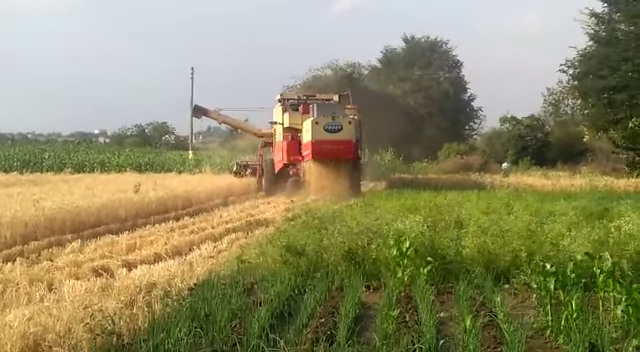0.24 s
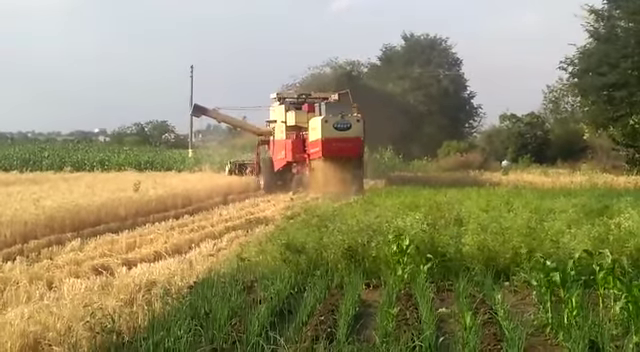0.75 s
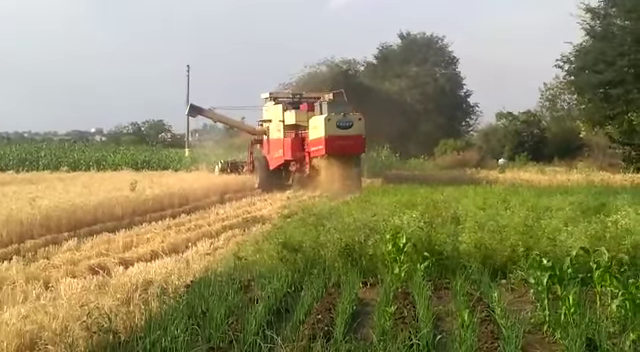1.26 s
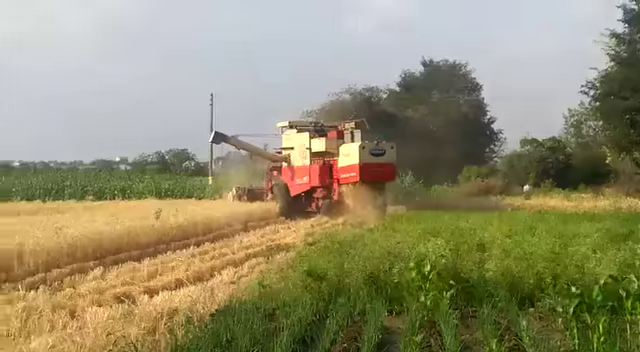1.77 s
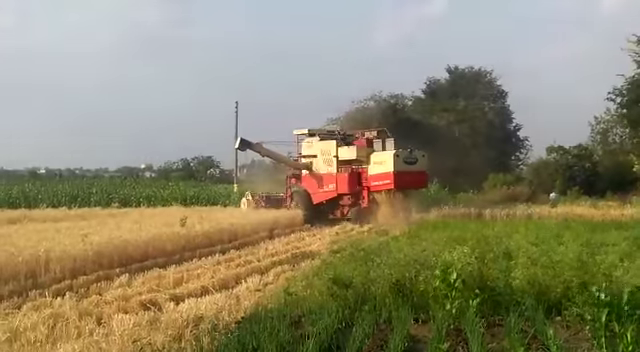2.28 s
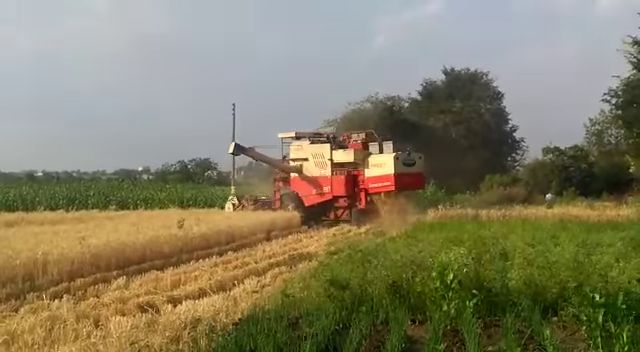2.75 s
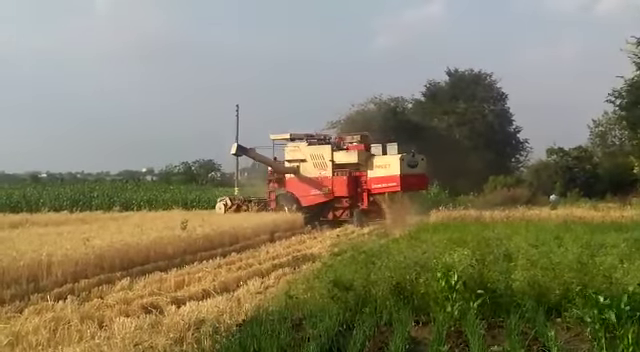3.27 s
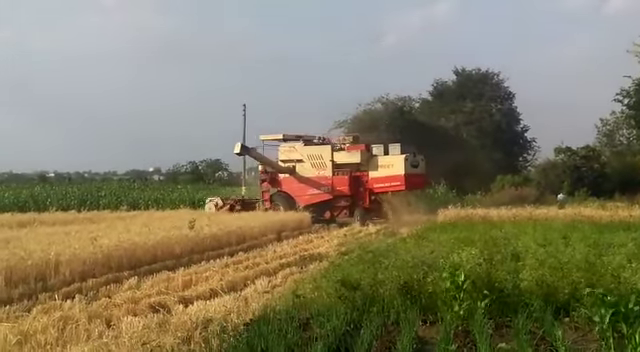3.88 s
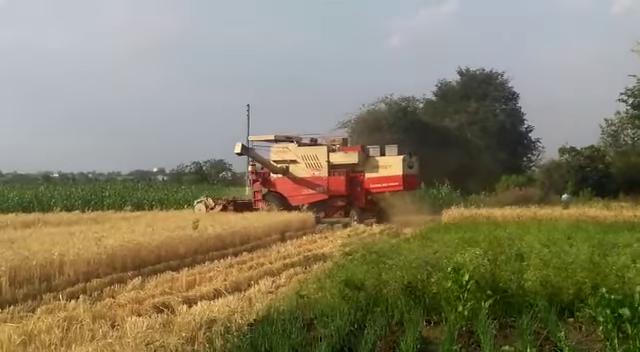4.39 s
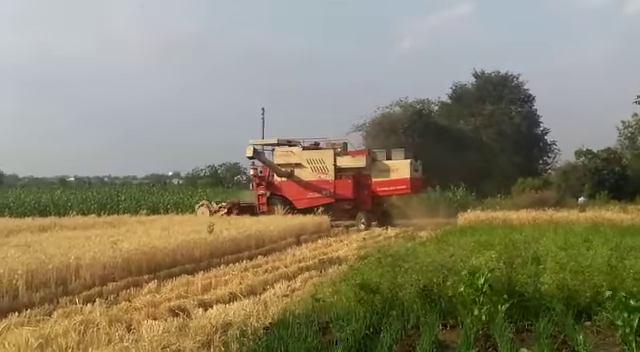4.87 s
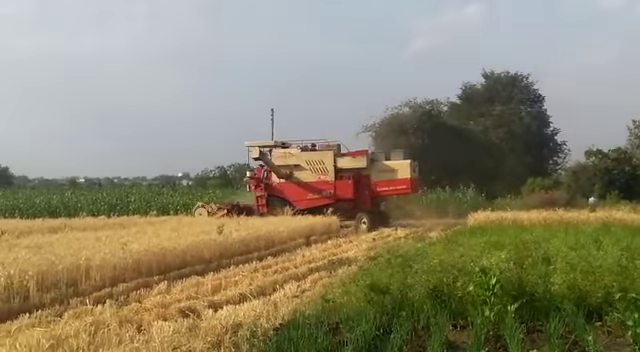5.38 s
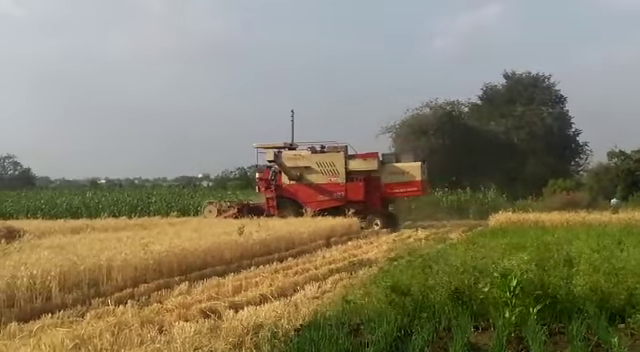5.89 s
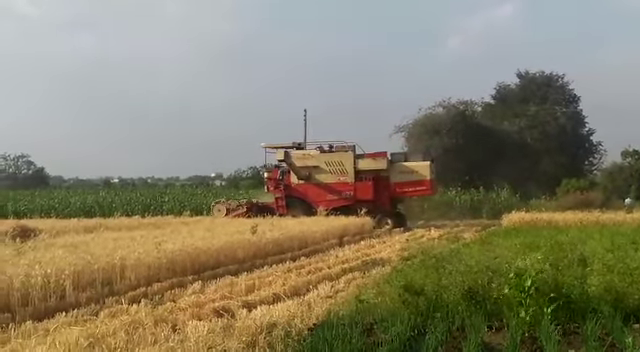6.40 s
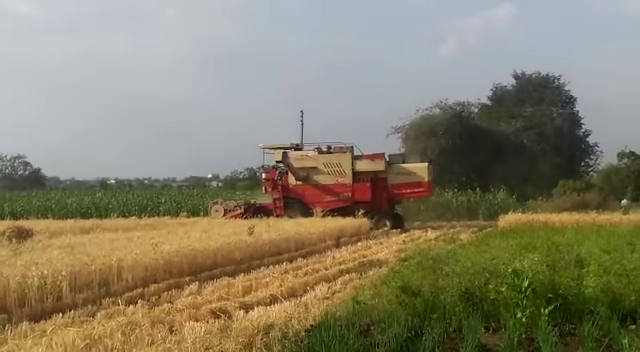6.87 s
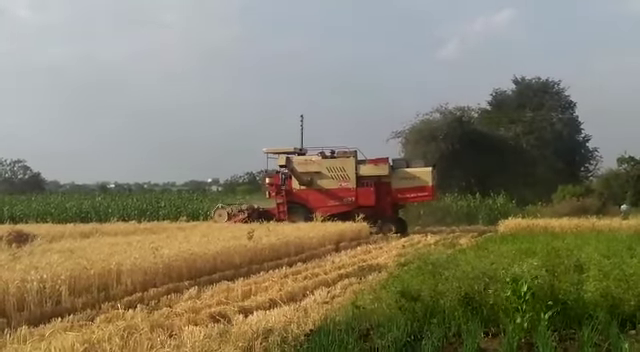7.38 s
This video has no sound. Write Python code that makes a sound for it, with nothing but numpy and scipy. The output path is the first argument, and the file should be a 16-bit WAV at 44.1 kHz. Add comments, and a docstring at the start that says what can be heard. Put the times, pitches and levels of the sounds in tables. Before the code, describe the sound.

Outdoor handheld capture of a distant harvester. Its engine drones and growls without a break, under a grainy rattle and a treble hiss that brightens around the middle and dulls toward the end. Low wind buffets, swinging between left and right, bump over it early, near two seconds and strongly between four and five, with brief cracks; afterwards the machine continues with little wind.

```python
"""The roar of a six-cylinder diesel runs throughout: a combine harvester turns in a wheat field some way off.
The roar and the thresher's rattle are noise that swells with each firing, under sine hums and ringing panels. A
fan hiss and hiss in several treble bands are narrower noises; the machine's loudness dips and climbs back.
Gusts thump, heard in opposite sense at the two ports, as short swinging waves over lumpy noise. Sharp cracks
and a very faint airy floor complete the scene."""
import sys
import numpy as np
from scipy import signal
from scipy.fft import rfft, irfft, next_fast_len
from scipy.io import wavfile
from scipy.ndimage import uniform_filter1d, map_coordinates

SR = 44100
rng = np.random.default_rng(int(sys.argv[2]) if len(sys.argv) > 2 else 0)


def dump(signal):
    """Clip the signal to [-1, 1] and save it as 16-bit WAV at the path in sys.argv[1]."""
    limited = np.clip(np.atleast_2d(signal).T, -1, 1)
    pcm = np.round(limited * 32767).astype(np.int16)
    wavfile.write(sys.argv[1], SR, pcm)


N = 336924  # length in samples

# The machine shows more of its engine side as it turns; levels are over its loudness:
# (time [s], engine [dB], thresher [dB], fan hiss [dB])
TURN = [(0, 0, -10, -22.5), (.5, 1, -8.5, -22.5), (1, 0.5, -8.5, -19), (1.5, 1, -9, -21.5),
        (2, 2, -7.5, -17.5), (2.4, -1, -7.5, -16.5), (2.8, 1.5, -7.5, -18.5), (3.2, 3, -7.5, -17.5),
        (3.6, 1.5, -10, -19), (4.25, 2.5, -9, -19), (4.95, 2.5, -6, -15.5), (5.5, 2, -7, -18),
        (6, 3, -7.5, -18.5), (6.35, 3.5, -8, -20.5), (6.6, 2.5, -9, -21), (6.83, 1, -10, -20.5),
        (7.05, 1, -7, -19), (7.3, 0.5, -6.5, -21.5), (7.64, 0, -8.5, -21)]
FIRING_HZ = 88.6  # average rate; it wanders a little
# Exhaust tones over the loudness, before their wobble: (multiple of firing [times], level [dB])
EXHAUST_TONES = [(1, -15), (2, -14), (7.5, -17), (12, -22)]
# How hard each cylinder barks, in firing order: one relative strength each [no unit]
CYLINDERS = [0.43, 0.28, 0.34, 0.33, 0.43, 0.15]
DRUM_HZ, DRUM_SAG_HZ_PER_S = 96, .25  # a second shaft that slows under load
# Hum of the second shaft over the loudness, before its swell: (multiple of shaft rate [times], level [dB])
DRUM_TONES = [(3, -19.5), (4, -22.5), (5, -19.5), (6, -25)]
CHATTER_PER_S, CHATTER_MS, CHATTER_DEPTH = 420, 1.2, 0.14  # loose parts knock at random; time to die away

# Tone colours of the noises; only the shape counts. Engine roar: (frequency [Hz], density [dB per Hz])
ENGINE = [(40, -45), (62, -17.5), (85, -4), (180, -0.5), (270, -8), (470, -5), (730, -0.5), (950, -5.5),
          (1250, -3.5), (1590, -10.5), (1850, -13.5), (2300, -32), (3000, -120)]
# Thresher rattle: (frequency [Hz], density [dB per Hz])
THRESHER = [(1400, -54), (1850, -2), (2170, 4.5), (2500, -7.5), (2950, -3.5), (3450, -3.5), (3620, -7),
            (3790, -23), (4050, -15), (4400, -21.5), (4700, -34), (5200, -68)]
# Fan hiss: (frequency [Hz], density [dB per Hz])
FAN = [(4300, -58.5), (4600, -11), (5000, -7.5), (5300, 2), (5500, -0.5), (5900, -4.5), (6400, -29),
       (7000, -56)]
# Hiss around 6 kHz: (frequency [Hz], density [dB per Hz])
HISS_6K = [(5000, -36.5), (5700, 7.5), (6300, 10.5), (6650, 9.5), (6880, 10), (7150, 0), (7450, 5),
           (7800, -2), (8200, 0)]
# Hiss around 8 kHz: (frequency [Hz], density [dB per Hz])
HISS_8K = [(7200, -23.5), (7700, -8.5), (8500, -0.5), (9100, -3.5), (9500, -23.5)]
# Hiss around 10 kHz: (frequency [Hz], density [dB per Hz])
HISS_10K = [(9100, -30.5), (9500, -6), (10080, -3), (10600, -5), (10900, -30)]
# Thin hiss around 14 kHz: (frequency [Hz], density [dB per Hz])
HISS_14K = [(12600, -28.5), (13400, -1.5), (14100, 1.5), (14700, -3), (15100, -43.5)]
# Airy floor: (frequency [Hz], density [dB per Hz])
AIR = [(7500, -37), (8500, 0), (12000, 1), (15000, 1)]

# Treble hiss over the loudness:
# (time [s], 6 kHz hiss [dB], its upper edge [Hz], 8 kHz hiss [dB], 10 kHz hiss [dB], 14 kHz hiss [dB])
TREBLE = [(0, -23, 7100, -44, -39, -52), (.25, -22, 7160, -30, -28.5, -50),
          (.5, -24.5, 7100, -37, -33, -46), (1, -20.5, 7100, -28.5, -30, -52),
          (1.3, -29, 7300, -27, -42, -56), (1.4, -28, 7000, -35, -42, -57),
          (1.75, -26, 6860, -46, -40, -52), (1.93, -21, 7500, -55, -37, -48),
          (2.05, -23, 7200, -72, -49, -50), (2.3, -15, 7470, -75, -39, -55),
          (2.6, -15, 7540, -75, -45, -60), (2.75, -14.5, 7900, -76, -52, -63),
          (3.05, -16, 7600, -75, -45, -57), (3.2, -14.5, 7490, -75, -39, -45),
          (3.45, -26.5, 7220, -54, -49, -48), (3.8, -25.5, 7000, -60, -47, -52),
          (4.05, -27, 7100, -63, -50, -53), (4.25, -21, 7080, -65, -46, -39),
          (4.45, -24, 7200, -60, -47, -50), (4.7, -23.5, 7270, -53, -40, -47),
          (5.3, -23, 7000, -58, -49, -45), (5.7, -27.5, 7100, -54, -51, -55.5),
          (6.5, -29, 6980, -58, -56, -63.5), (6.85, -40, 7050, -51.5, -55.5, -58.5),
          (7.64, -40, 7140, -54, -58, -76)]
EDGE_HZ = 55  # how soft the upper edge is
# Humming sheet metal: (frequency [Hz], width [Hz], lift before its own fading [dB])
PANELS = [(556.4, 44, 5), (662, 19, 1), (742, 23, 2), (840, 11, 0), (1126, 24, 4), (1241, 23, 4.5),
          (1368, 22, 3.5), (1480, 11, 5), (1726, 26, 4.5), (1950, 24, 3), (2970, 33, 5), (3390, 24, 3)]
BOOM_HZ, BOOM_WIDTH_HZ = 750, 340  # the hollow body of the machine
# Slow swells: (time [s], body boom lift [dB], lowest panel [dB], second shaft hum [dB])
BOOM = [(0, 2, 8, 8.5), (.6, -2.5, -5, 5.5), (1.2, 0.5, -8, 0), (1.6, -2.5, -1, 6), (1.8, -2.5, 0, 2),
        (2, -4.5, 9, 0), (2.15, 1.5, -2, 2), (2.5, -1.5, -0.5, -1), (3.1, 0.5, 0, 5), (3.6, 0.5, 5, 2.5),
        (4.2, 1, -7, -6.5), (4.6, 0, 3, -3), (5.2, 0, 4, -1), (5.9, 3, 2.5, -3), (6.15, 2.5, -0.5, -2),
        (6.38, 3.5, 10, -4), (6.55, 0, -10, 5.5), (6.9, 3.5, 3, 2), (7.2, 3.5, 1.5, -3.5),
        (7.64, 1.5, -5, -4.5)]
# Parts of the roar that swell apart: (centre [Hz], width [Hz])
ROAR_BANDS = [(75, 49), (260, 90), (370, 100), (500, 100), (1000, 200), (1550, 350), (1900, 250)]
# Lift of each roar band over time: (time [s], one lift per band [dB])
ROAR = [(0, -0.5, 0, -2, 0, 2.2, 0, 0), (.7, 1, 0, -0.5, -1, 1, 0.77, 2.6),
        (1.4, -1, 0, -0.5, -2, -1, 0, -0.22), (2.1, 1, 0, -1, -2, 0.24, -0.43, -1.2),
        (2.7, 3, 0, 1, 0, 0, 0.8, -0.57), (3.3, 4.5, 0, -3, 1, -0.45, 2, 0),
        (4, 1, 0, -0.5, 0, 0, 1, -0.25), (4.7, 2, -1, -2.5, 0, 0, -0.15, 0),
        (5.3, -4, -2, 0.5, 0, 0, 0, 0.21), (5.9, -1, -2, 0.5, 0, 0, -0.81, 0.6),
        (6.4, -1, -2, 4.5, -1, 0.34, -1.5, 0), (7, -2.5, -2, 2.5, 0, 0.35, 0, 0),
        (7.64, -1, -2, 0, -1, 1, 0, 0)]
# Parts of the rasp that swell apart: (centre [Hz], width [Hz])
RASP_BANDS = [(2400, 300), (2960, 200), (3400, 710), (3850, 250), (5300, 400), (5950, 440), (6890, 94)]
# Lift of each rasp band over time: (time [s], one lift per band [dB])
RASP = [(0, 4, 0, 0, 4, 0, 5, 2), (.8, 4, 0, -0.38, 9, 0, 4, 2), (1.4, 3.5, 2.2, -1, 3, 0, 2, 4.4),
        (2.1, -3, 0.48, 0.34, 1, 0, 0, 1), (2.7, -4.5, 0.45, 0, 5, 0, -4, 1),
        (3.3, 0.5, 0.2, 0.25, 4, 0, -4.5, 2), (4, -0.5, 0, 0, -4, 0, -4, 6.7), (4.7, -1, 0, 0, 10, 0, 0, 6),
        (5.3, -1.5, 1, -1.3, 1, 1, -3.5, 6), (5.8, 2, 1.4, -2.7, -9, 1.1, -2.5, 8),
        (6.3, 5.5, 2.3, -1.5, -9, 1.3, -1.5, 15), (6.65, 5.5, 2.6, -2, -1, 2, -3, 6.8),
        (7, 1.5, 0.32, 1, -7, 2, -3, 8), (7.3, -3, 0, 3.1, -9.5, 2.3, -7.5, 8),
        (7.64, -0.5, 0, 2.4, -1, 2.2, -6, 8)]

# Moments when the machine's loudness dips, before smoothing: (time [s], loudness just after [dB])
DIPS = [(0, -30.5), (.171, -31.5), (.217, -33), (.28, -37), (1.331, -37), (1.383, -38), (2.156, -33),
        (2.301, -35), (3.24, -29.5), (3.349, -30), (3.407, -32.5), (4.334, -32), (4.451, -33),
        (4.494, -35.5), (4.594, -36.5), (4.825, -40), (5.206, -36.5), (5.75, -33), (6.76, -28.5)]
CLIMB_DB_PER_S, FULL_DB = 9.5, -26.5  # the way back up, and where it ends
FALL_S = .016  # how long a dip takes to set in

# How far the left port leads the right, nearly: (frequency [Hz], phase [radians])
LEAD = [(0, 0), (1200, .05), (1810, .9), (2250, 3.1), (2930, 5.85), (3300, 6.28), (3650, 6.35), (3790, 6.5),
        (4000, 8.1), (5100, 11.4), (7000, 16.7), (15000, 39.6)]
# How much stronger the left port is, nearly: (frequency [Hz], level [dB])
LEFT = [(100, 6.5), (600, 4), (1400, -0.5), (1900, 0), (2200, 2), (3000, -1), (4000, 1), (5200, 1.5),
        (7000, 3), (9000, 3), (14000, 0)]
# How alike the two ports sound, nearly: (frequency [Hz], likeness [0 to 1])
ALIKE = [(150, 0.83), (400, 0.97), (700, 0.96), (1200, 1), (1800, 0.88), (2200, 1), (2600, 0.58),
         (3300, .995), (3800, 0.84), (4300, 0.97), (7000, 0.96), (12000, 0.82)]

# Strength of the wind on the ports, before each layer's gain: (time [s], level [dB])
GUST = [(0, -23.5), (.1, -19), (.29, -14.5), (.32, -27.5), (.6, -23), (.93, -20), (1.06, -19), (1.13, -18),
        (1.2, -20), (1.3, -18.5), (1.37, -22.5), (1.42, -31), (1.46, -22.5), (1.55, -26), (1.7, -19.5),
        (2, -23.5), (2.12, -19.5), (2.28, -14.5), (2.33, -21), (2.42, -26), (2.5, -26), (2.58, -25.5),
        (2.72, -21), (2.9, -29.5), (3.2, -20.5), (3.42, -22), (3.5, -23.5), (3.7, -30), (4.05, -22.5),
        (4.47, -16), (4.52, -19.5), (4.65, -26), (4.82, -21), (4.85, -21.5), (5.0, -28), (5.15, -25),
        (5.65, -31), (6.05, -23), (6.45, -37.5), (6.75, -26.5), (7.3, -32.5), (7.64, -25.5)]
# Colour of the wind felt oppositely at the ports; shape only: (frequency [Hz], density [dB per Hz])
BUFFET = [(20, -34), (45, -11), (77, -5.5), (109, 4), (160, -0.5), (240, -5), (368, -15.5), (605, -26.5),
          (1000, -49.5), (2000, -120)]
# Colour of the wind felt alike at both ports; shape only: (frequency [Hz], density [dB per Hz])
SHARED = [(20, -48.5), (45, -36), (90, -3.5), (150, -1), (260, 0), (420, -12.5), (900, -48), (2000, -120)]
# Loud blows of wind, before filter and port gains:
# (time [s], peak [dB], base pitch [Hz], length at half height [ms], shared part over peak [dB])
THUMPS = [(0.105, -21, 156, 7.4, -17), (0.127, -9.5, 154, 6.6, -7), (0.152, -13, 160, 8, -17),
          (0.17, -8, 210, 8.1, -15), (0.181, -6.5, 170, 6.5, -10), (0.187, -10, 185, 3.1, -2),
          (0.216, -13, 169, 6.3, -9), (0.277, 4, 159, 2.6, -20), (0.294, -9, 195, 5, -23),
          (0.302, -7, 260, 3.3, -15), (0.973, -12, 140, 11, -10), (0.987, -14, 180, 6, -12),
          (1.018, -14, 140, 10, -11), (1.047, -7, 200, 6, -9), (1.061, -13, 220, 6, -8),
          (1.072, -4, 149, 7.6, -15), (1.108, -16, 148, 7.1, -11), (1.155, -16, 260, 8, -9),
          (1.173, -10, 125, 8.3, -12.5), (1.186, -10, 125, 9.2, -15), (1.243, -13, 130, 7.1, -12),
          (1.289, -6, 217, 3.1, -22), (1.332, -7, 228, 5.1, -3), (1.383, -3.5, 228, 3.1, -6),
          (1.463, -17, 250, 5, -9), (1.633, -11, 195, 2.9, -6.5), (1.667, -11, 159, 6.9, -6.5),
          (1.688, -6, 123, 6.7, -15), (1.749, -11, 129, 15, -20), (1.873, -10, 188, 4.2, -7.5),
          (1.93, -14, 220, 8.5, -8), (2.003, -11, 140, 11, -20), (2.042, -17, 220, 6, -11),
          (2.142, -13, 140, 10, -10), (2.155, -5, 250, 4.4, -5.5), (2.18, -6, 205, 5.6, -14),
          (2.197, -14, 280, 7, -10), (2.216, -8, 155, 11, -11), (2.233, -17, 217, 5, -4),
          (2.265, -15, 270, 10, -8), (2.302, -5.5, 172, 9.4, -10), (2.312, -10, 230, 5.4, -6),
          (2.385, -14.5, 200, 13, -15), (2.448, -12, 240, 5.5, -14), (2.525, -15, 170, 11, -15),
          (2.538, -16, 130, 8, -14), (2.602, -10, 175, 6, -9.5), (2.66, -16, 140, 16, -14),
          (3.184, -11, 149, 5.1, -13), (3.236, -13, 191, 6.6, -8), (3.29, -17, 167, 6.3, -16),
          (3.349, -7, 164, 9.4, -15), (3.382, -13, 260, 6.5, -13), (3.392, -11, 150, 8, -13),
          (3.405, -5, 180, 6, -7), (3.423, -10, 228, 3.1, -8), (3.447, -16, 136, 7.8, -23),
          (3.502, -14, 190, 6, -15), (4.025, -12, 190, 5, -16), (4.036, -13, 130, 7, -14),
          (4.056, -12, 130, 9.7, -18), (4.087, -13, 180, 8, -14), (4.175, -11, 160, 10, -14),
          (4.256, -9, 199, 5, -12), (4.284, -14, 180, 7.7, -8), (4.333, -6, 163, 6.3, -14),
          (4.361, -11, 168, 5, -11), (4.395, -7, 168, 7.9, -17), (4.41, -12, 133, 3.5, -19),
          (4.429, -7, 129, 7.3, -19), (4.451, -3.5, 244, 4.8, -3.5), (4.461, -10, 220, 5, -11),
          (4.471, -7, 231, 7, -11), (4.496, -5, 174, 5.4, -14), (4.545, -13.5, 140, 12, -12),
          (4.594, -3.5, 176, 4.9, -9), (4.607, -11.5, 220, 3.4, -5.5), (4.642, -14, 230, 6, -13),
          (4.7, -14, 170, 4, -4), (4.713, -8.5, 158, 6.5, -13), (4.725, -15, 230, 5, -16),
          (4.738, -14, 188, 6.9, -22), (4.816, -8, 240, 3.8, -9), (4.826, -1, 134, 5.7, -22),
          (4.873, -14, 180, 6.2, -11), (4.915, -14, 202, 8.2, -15), (5.03, -14, 220, 6.1, -14),
          (5.098, -21, 150, 8.7, -10), (5.122, -11, 260, 4.1, -6.5), (5.133, -11.5, 130, 12, -9),
          (5.16, -14, 179, 6.7, -6), (5.205, -8, 185, 6.3, -10), (5.896, -16, 165, 6.9, -5),
          (5.913, -13, 145, 8.6, -10), (6.114, -17, 138, 12, -8), (6.76, -9, 151, 6, -15)]
# Small blows come by chance and grow with the wind: peak over the wind, scatter either way,
# middle base pitch, middle length, shared part over the peak
PUFF_COUNT = 50
PUFF_DB, PUFF_SCATTER_DB, PUFF_HZ, PUFF_MS, PUFF_SHARED_DB = 0, 4.5, 154, 6.4, -12
SWEEP_MS = 0.41  # an eddy meets the right port first
# Sharp cracks inside a gust:
# (time [s], peak [dB], pitch [Hz], length at half height [ms], tick over the crack [dB])
SNAPS = [(4.705, -23, 740, 4.6, -62), (4.818, -16, 350, 3.7, -54), (4.822, -14.5, 560, 2.7, -49.5),
         (4.827, -17, 280, 4.4, -53.5)]
TOP_HZ = 15200  # nothing sounds above this


def amp(db):
    """Turn dB into gain."""
    return 10 ** (np.asarray(db) / 20)


def unit(x):
    """Scale to an average (rms) strength of 1."""
    return x / np.sqrt(np.mean(x ** 2) + 1e-20)


def along(points, hz):
    """Read a curve of (frequency, value) points on a log frequency axis."""
    f, v = np.transpose(points)
    return np.interp(np.log(hz + 1), np.log(f + 1), v)


def curves(rows):
    """Give one value per sample for each column after the time."""
    s, *columns = np.transpose(rows)
    return [np.interp(np.arange(N) / SR, s, column) for column in columns]


def wobble(rate):
    """Draw a smooth random curve with this many random points a second."""
    points = rng.standard_normal(int(N * rate / SR) + 4)
    return map_coordinates(points, [np.arange(N) * rate / SR])


def filtered(x, response):
    """Change the strength and phase of each frequency in x."""
    m = next_fast_len(N + 8192)
    return irfft(rfft(x, m) * response(np.fft.rfftfreq(m, 1 / SR)), m)[..., :N]


def bell(hz, centre, width):
    """A smooth peak at centre, half as high half a width away."""
    return 1 / (1 + (2 * (hz - centre) / width) ** 2)


def pulse(t, ms):
    """A smooth swell around t = 0, as long as ms at half its height."""
    return np.exp(-np.log(16) * (t / (ms / 1000)) ** 2)


def rush(spectrum, patchy_db, gate=1):
    """Rushing sound: two coloured noises of joint rms 1 that share random loud and soft patches."""
    z = signal.stft(rng.standard_normal((2, N)), nperseg=512)[2]
    patches = uniform_filter1d(rng.standard_normal(z.shape[1:]), size=5, axis=0)
    patches = uniform_filter1d(patches, size=8, axis=1)
    pair = signal.istft(z * amp(patchy_db * unit(patches)), nperseg=512)[1][:, :N]

    def colour(hz):
        inside = (hz > spectrum[0][0]) * (hz < spectrum[-1][0])
        return amp(along(spectrum, hz)) * inside
    return unit(filtered(pair * gate, colour))


def combine():
    """The harvester's roar and rattle swell with each firing, with hums and a fan hiss; narrow treble hiss
    bands sound alongside."""
    engine_db, thresher_db, fan_db = curves(TURN)
    boom_db, panel_db, drum_db = curves(BOOM)
    db_6k, _, db_8k, db_10k, db_14k = curves(TREBLE)
    cycles = np.cumsum(FIRING_HZ * (1 + .004 * wobble(2.5) + .004 * wobble(15))) / SR
    drum_hz = DRUM_HZ - DRUM_SAG_HZ_PER_S * np.arange(N) / SR
    turns = np.cumsum(drum_hz * (1 + 0.00443 * wobble(3))) / SR
    strength = np.take(CYLINDERS, cycles.astype(int) % len(CYLINDERS))
    bark = strength * np.exp(-1.5 * (cycles % 1))  # fades until the next firing
    rattle = chatter()

    roar = amp(engine_db) * rush(ENGINE, patchy_db=0.5, gate=rattle * (1 + 0.32 * bark))
    thresher = amp(thresher_db) * rush(THRESHER, patchy_db=1.27, gate=rattle * (1 + 0.25 * bark))
    tones = hum(EXHAUST_TONES, cycles) + amp(drum_db) * hum(DRUM_TONES, turns)
    tones += sheet_metal((roar + thresher)[0], boom_db, panel_db)
    fan = amp(fan_db) * rush(FAN, patchy_db=1.1, gate=rattle)
    hiss_6k = amp(db_6k) * rush(HISS_6K, patchy_db=4.0, gate=rattle)
    hiss_8k = amp(db_8k) * rush(HISS_8K, patchy_db=2.5)
    hiss_10k = amp(db_10k) * rush(HISS_10K, patchy_db=4.0)
    hiss_14k = amp(db_14k) * rush(HISS_14K, patchy_db=4.5)
    body = swelling_bands(roar + thresher + fan + hiss_6k)
    direct_tones = tones * [[1], [0]]  # no scattered part
    return amp(loudness()) * (direct_tones + body + hiss_8k + hiss_10k + hiss_14k)


def chatter():
    """Loose parts knock at random and each knock dies away, on top of a slow uneven level."""
    knocks = (rng.random(N) < CHATTER_PER_S / SR) * rng.exponential(size=N)
    fading = signal.lfilter([1], [1, -np.exp(-1000 / (CHATTER_MS * SR))], knocks)
    return amp(0.57 * wobble(40)) * (1 + CHATTER_DEPTH * fading)


def hum(tones, phase):
    """A steady source hums at multiples of its rate, each with a wobbling level."""
    total = 0
    for multiple, db in tones:
        sine = np.sqrt(2) * np.sin(2 * np.pi * multiple * phase)
        total += amp(db + 2.26 * wobble(2.93)) * sine
    return total


def sheet_metal(noise, boom_db, panel_db):
    """The noise rings the panels and hollow body: narrow bands of it are lifted."""
    centre, width, lift_db = np.transpose(PANELS + [(BOOM_HZ, BOOM_WIDTH_HZ, 0)])[..., None]
    *rings, boom = filtered(noise, lambda hz: bell(hz, centre, width))
    rings[0] = amp(panel_db) * rings[0]
    total = (amp(boom_db) - 1) * boom
    for db, ring in zip(lift_db, rings):
        total += (amp(db) - 1) * amp(1.9 * wobble(3.0)) * ring  # each fades in its own time
    return total


def swelling_bands(x):
    """Bands swell in their own time and the upper edge of the hiss slides."""
    hz, t, z = signal.stft(x, SR, nperseg=1024)
    hz = hz[:, None]
    lift_db = 0
    for rows, bands in ((ROAR, ROAR_BANDS), (RASP, RASP_BANDS)):
        s, *lifts = np.transpose(rows)
        for db, (centre, width) in zip(lifts, bands):
            lift_db = lift_db + np.interp(t, s, db) * bell(hz, centre, width)
    edge = np.interp(t, *np.transpose(TREBLE)[[0, 2]])
    under = (1 - np.tanh((hz - edge) / EDGE_HZ)) / 2
    return signal.istft(z * amp(lift_db) * under, SR, nperseg=1024)[1][:, :N]


def loudness():
    """The machine's loudness (dB) dips at listed moments and climbs back at a steady pace."""
    t, level = np.arange(N) / SR, np.full(N, float(FULL_DB))
    for s, db in DIPS:
        climb = db + CLIMB_DB_PER_S * (t - s)
        level = np.where(t >= s, np.minimum(level, climb), level)
    return uniform_filter1d(level, size=int(FALL_S * SR) + 1)


def ports(pair):
    """One source and a little scattered sound reach two ports with a phase lead and a level tilt."""
    def heard(side):
        def response(hz):
            angle = np.arccos(np.clip(along(ALIKE, hz), 0, 1)) / 2
            level = amp(side * along(LEFT, hz) / 2)
            lead = np.exp(.5j * side * np.interp(hz, *np.transpose(LEAD)))
            return level * lead * [np.cos(angle), side * np.sin(angle)]  # direct, scattered
        return filtered(pair, response).sum(axis=0)
    return np.array([heard(0.87), heard(-1.127)])  # left, right


def wind():
    """Buffeting and thumps sound in opposite sense at the two ports; another part is shared."""
    lumps = unit(amp(2.8 * np.tanh(0.33 * wobble(40)) + 2.0 * wobble(9)))
    gust = amp(curves(GUST)[0]) * lumps
    colour = lambda hz: amp([along(BUFFET, hz), along(SHARED, hz)])
    push, shared = [gust * unit(layer) for layer in filtered(rng.standard_normal((2, N)), colour)]
    thump, knock = thumps()
    push, shared = amp(-4) * push + thump, amp(-14.5) * shared + knock
    # Delay the left port and advance the right by half the sweep each
    sweep = lambda hz: np.exp(1j * np.pi * hz * SWEEP_MS / 1000 * np.array([[-1], [1]]))
    return shared + filtered(push, sweep) * [[amp(1.57)], [-amp(0.67)]]


def thumps():
    """Each blow is a short swinging wave with an opposed part and a shared part, cut in the deep bass."""
    t = np.arange(-2000, 2000) / SR
    blows = np.zeros((2, N + 4000))
    rows = THUMPS + puffs()
    draws = rng.standard_normal((len(rows), 3))
    for (s, db, hz, ms, shared_db), (phase, glide, other) in zip(rows, draws):
        # The pitch usually sinks as the eddy passes
        swing = 2 * np.pi * hz * t * (1 - 15 * (1 + 0.27 * glide) * t)
        opposed = np.sin(0.89 * swing + 3 * phase) + 0.16 * np.sin(2.05 * swing + 3 * other)
        alike = amp(shared_db) * np.sin(1.153 * swing + 3 * phase + 1.34)
        blows[:, round(s * SR):][:, :4000] += amp(db) * pulse(t, ms) * [opposed, alike]
    return filtered(blows[:, 2000:], lambda hz: 1 / (1 + (72 / (hz + 1)) ** 6))


def puffs():
    """Small blows at random moments, stronger where the wind is, in rows like the loud ones."""
    s, size, pitch, length = np.transpose(rng.random((PUFF_COUNT, 4)))
    s = s * (N - 1) / SR
    db = np.interp(s, *np.transpose(GUST)) + PUFF_DB + PUFF_SCATTER_DB * (2 * size - 1)
    hz, ms = PUFF_HZ * (.8 + .4 * pitch), PUFF_MS * (.5 + length)
    return [(*row, PUFF_SHARED_DB) for row in zip(s, db, hz, ms)]


def snaps():
    """Sharp cracks: a brief cosine burst with a faint noisy tick on top, alike at both ports."""
    out, t = np.zeros(N), np.arange(-600, 600) / SR
    for s, db, hz, ms, tick_db in SNAPS:
        tick = amp(tick_db) * rng.standard_normal(len(t))
        crack = np.cos(2 * np.pi * hz * t) + tick
        out[round(s * SR) - 600:][:len(t)] += amp(db) * pulse(t, ms) * crack
    return out


def airy_floor():
    """A very faint, patchy high hiss behind everything."""
    return amp(-80.0) * rush(AIR, patchy_db=6.5)


def scene():
    """Machine, wind, cracks and airy floor together."""
    return ports(combine()) + wind() + snaps() + airy_floor()


def record(dry):
    """Peaks round off near full scale, then everything above the top frequency is removed."""
    soft = dry / (1 + np.abs(dry) ** 6) ** (1 / 6)
    return filtered(soft, lambda hz: hz < TOP_HZ)


dry = scene()
out = record(dry)
dump(out)
```